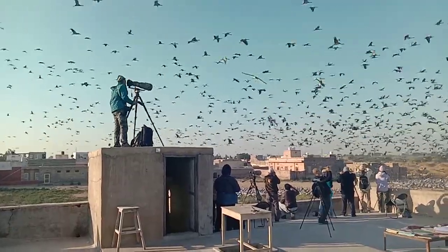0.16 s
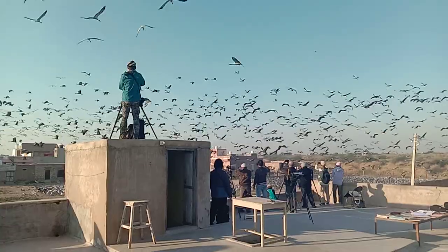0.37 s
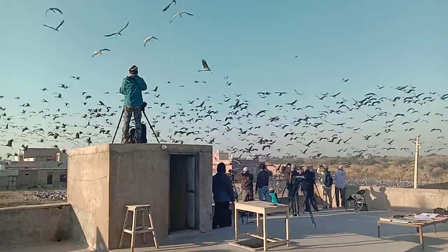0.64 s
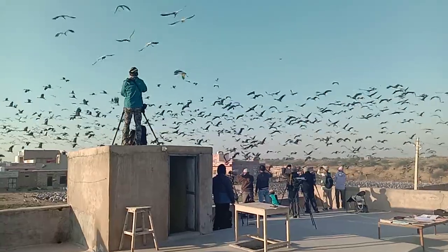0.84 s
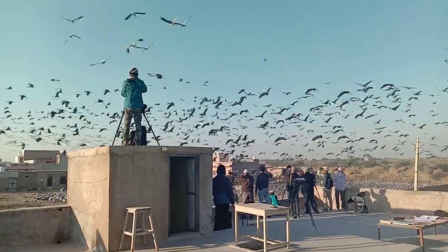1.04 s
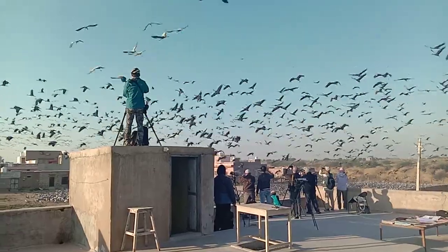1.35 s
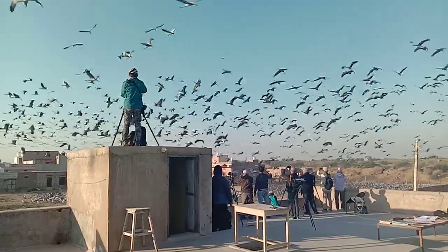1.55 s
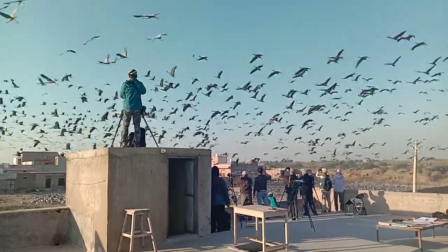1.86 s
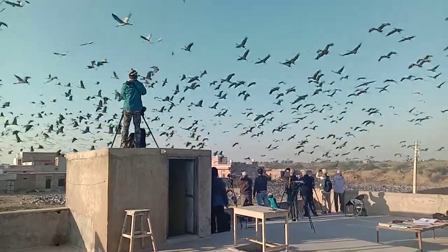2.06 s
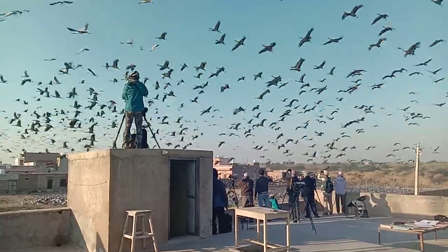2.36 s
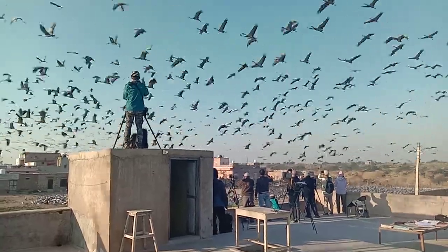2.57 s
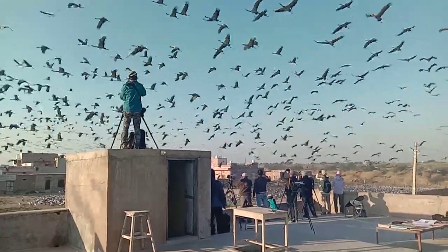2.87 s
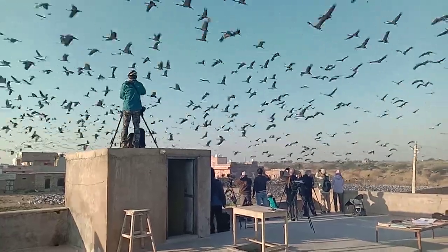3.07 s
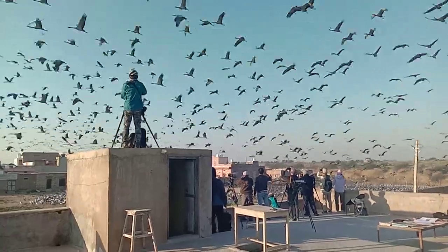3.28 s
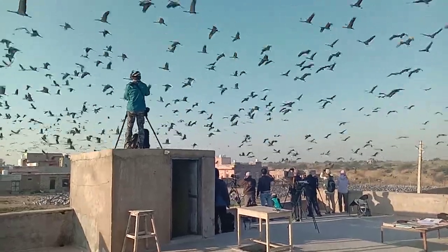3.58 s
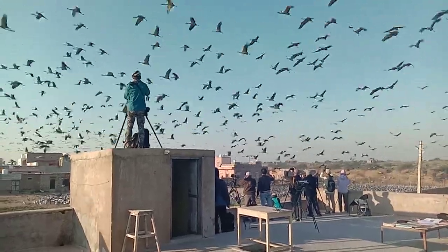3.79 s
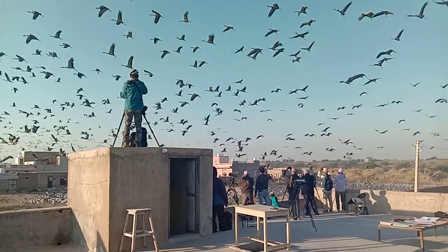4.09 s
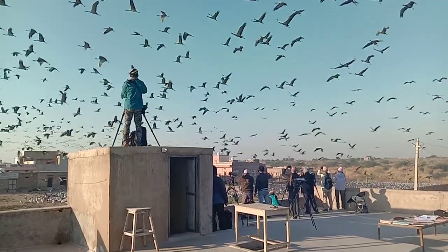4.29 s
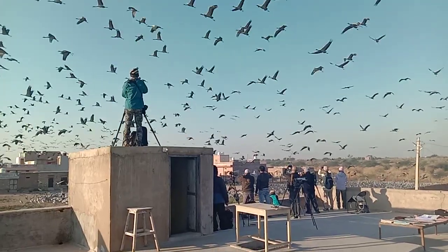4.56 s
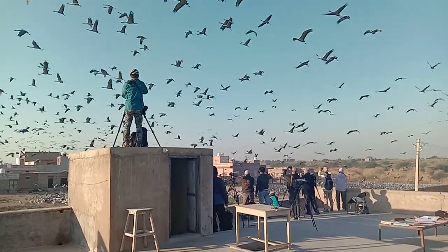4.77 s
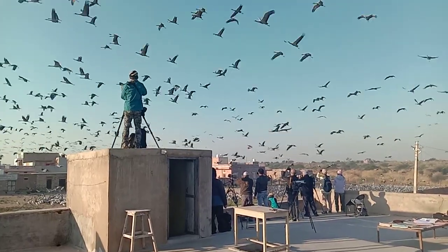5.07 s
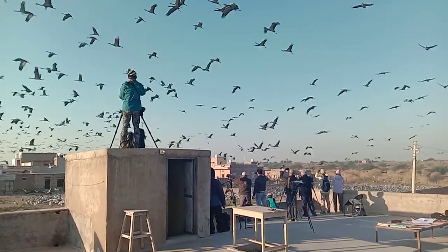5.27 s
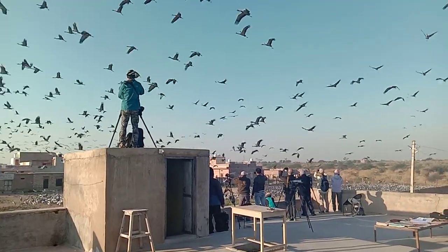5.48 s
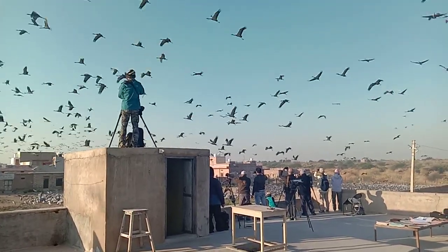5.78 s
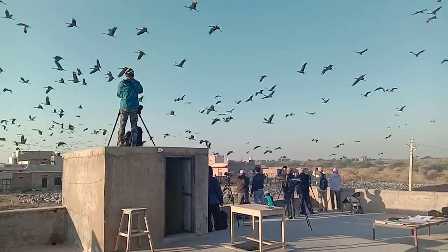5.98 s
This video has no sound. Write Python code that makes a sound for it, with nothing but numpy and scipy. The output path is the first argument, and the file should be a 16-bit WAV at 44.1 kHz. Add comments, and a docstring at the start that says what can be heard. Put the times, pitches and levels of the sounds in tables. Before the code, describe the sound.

A large flock of cranes is already in full cry at 0 s and keeps calling to the end at about 6 s. Hundreds of distant birds merge into an even, grainy mid-pitched roar, each call a short trumpeted roll of about thirty bursts a second. Harsh honks overlap in the first half second, with thin peeps near 0.5 s. Nearer rattles follow one another, and single honks, some higher, some low and mellow, rise out of the crowd. Wind thumps and rumbles low on the microphone, strongest from 1.4 to 3.3 s, with a stronger buffet at 1.7. Young birds whistle around 2 s and briefly near 3.2. From 3.2 to 4.8 s close rattles are crowded, loud and brighter. Then they thin out; clear peeps come at 5.3 to 5.6 s, and a strong, duller rattle closes around 6 s. Short dull rooftop echoes surround the nearer birds.

```python
"""Cranes over a windy rooftop

A large flock calls in flight over a rooftop while gusts of wind rumble on the microphone.
Each call is a rattle of about thirty bursts a second: rough pulses up close, chopped partials in whole calls.
Hundreds of far birds blur into a roar, near birds stand out burst by burst, some whole calls rise
out of the flock, and young birds peep above them. The roof and its walls echo the nearer birds."""
import sys
import numpy as np
from scipy import signal
from scipy.fft import rfft, irfft
from scipy.io import wavfile
from scipy.ndimage import uniform_filter1d

SR = 44100
rng = np.random.default_rng(int(sys.argv[2]) if len(sys.argv) > 2 else 0)


def unload_wav(signal):
    """Save mono or channel-first audio to the path in sys.argv[1] as 16-bit WAV at rate SR, clipped to [-1, 1]."""
    wavfile.write(
        sys.argv[1],
        SR,
        np.round(np.clip(np.atleast_2d(signal).T, -1, 1) * 32767).astype(np.int16),
    )


N = 270774  # samples


def gain_of(db):
    """Decibels to a factor."""
    return 10 ** (np.asarray(db) / 20)


def evened(x):
    """Scales to an rms of one."""
    return x / np.sqrt(np.mean(x ** 2) + 1e-20)


def smoothed_twice(x, size):
    """Two running means in a row."""
    return uniform_filter1d(uniform_filter1d(x, size), size)


def read(points, hz):
    """Reads a spectrum on a logarithmic frequency axis."""
    f, value = np.transpose(points)
    return np.interp(np.log(hz + 1), np.log(f + 1), value)


def curve(rows, column):
    """One column of a table as a value at every sample."""
    rows = np.asarray(rows)
    return np.interp(np.arange(N) / SR, rows[:, 0], rows[:, column])


def coloured(x, points):
    """Filters a sound by a spectrum in dB."""
    hz = np.fft.rfftfreq(len(x), 1 / SR)
    return irfft(rfft(x) * gain_of(read(points, hz)), len(x))


def above(x, hz, order=2):
    """The part of a sound above a frequency."""
    return signal.sosfilt(signal.butter(order, hz, "high", fs=SR, output="sos"), x)


def add(mix, s, sound):
    """Mixes a sound in at a time in seconds."""
    part = mix[round(s * SR):][:len(sound)]
    part += sound[:len(part)]


def beats(first_s, last_s, per_s):
    """Evenly spaced times, and for each its place from 0 to 1 and an arch that is 0 at both ends."""
    place = np.linspace(0, 1, round((last_s - first_s) * per_s) + 1)
    return first_s + (last_s - first_s) * place, place, np.sin(np.pi * place)


def honk(length, first_hz, last_hz, partials_db, rattle=0.56, fade=1.48, rough=0.02096):
    """A trumpeted call: a gliding stack of partials, chopped by the rattle, struck anew by each throat pulse."""
    t = np.arange(round(length * SR)) / SR
    # bursts and throat pulses per second, a little different in every call
    rattle_hz, beat_hz = np.array([31, 158]) * np.exp(.07 * rng.standard_normal(2))
    wobble = evened(uniform_filter1d(rng.standard_normal(len(t)), 90))
    uneven = evened(uniform_filter1d(rng.standard_normal(len(t)), 90))
    arch = 1 + 0.0481 * (np.sin(np.pi * t / length) - .6)  # the pitch rises a little into the middle
    glide_hz = first_hz + (last_hz - first_hz) * t / length
    turns = np.cumsum(glide_hz * (arch + rough * wobble)) / SR
    beat = (np.cumsum(beat_hz * (1 + 0.2455 * uneven)) / SR + rng.random()) % 1

    k = np.arange(1, len(partials_db) + 1)[:, None]
    pulses = np.exp(-fade * k * beat) * np.minimum(beat / 0.095, 1)  # higher partials die sooner after each pulse
    pulses = pulses / np.sqrt(np.mean(pulses ** 2, 1, keepdims=True))
    waves = np.sin(2 * np.pi * (k * turns + rng.random(k.shape)))
    tone = gain_of(partials_db) @ (pulses * waves)
    chop = np.maximum(1 - rattle * np.cos(2 * np.pi * rattle_hz * t), 0)
    return np.sqrt(2) * tone * evened(chop) * signal.windows.tukey(len(t), .35)


def far_flock(count=500):
    """Overlapping distant calls, each with its own pitch, glide, distance and mix of partials."""
    # treble level of the roar above 4.7 kHz, with a brief dip near the start: t/s, level/dB
    treble = [(0, 10.5), (.1, 1), (.22, 2), (.3, 8.5), (2.1, 7.5), (2.7, 4), (3, 8), (3.55, 7), (3.85, 6),
              (4.7, 6), (6.14, 6.5)]
    # spectrum of the roar before that treble level: f/Hz, level/dB
    colour = [(300, -43), (500, -34), (700, -15), (1000, -5.5), (1280, -3.5), (1800, -3), (2500, -6),
              (3800, -17.5), (5400, -31), (6200, -41.5), (7000, -36.5), (8100, -53.5), (9400, -48.5),
              (15600, -87)]
    lead_s = .3  # cut off the front, so that calls are already under way
    out = np.zeros(N + SR)
    starts = (np.arange(count) + rng.random(count)) * (N / SR + lead_s) / count
    traits = rng.standard_normal((count, 12))
    for s, (pitch, glide, length, near, *partials) in zip(starts, traits):
        # most birds near one pitch, some far off
        hz = 1285 * np.exp(np.clip(.06 * pitch * (1 + .8 * pitch ** 2), -.33, .33))
        last_hz = hz * np.exp(.1 * glide - .02)
        partials_db = 3.08 * np.array(partials) - 1.5 * abs(pitch) + 1.94 * near
        add(out, s, honk(.17 * np.exp(.3 * length), hz, last_hz, partials_db))
    wash = .4 * rng.standard_normal(N)  # the farthest birds are only a wash
    out = coloured(evened(out[round(lead_s * SR):][:N]) + wash, colour)
    out = out / np.sqrt(smoothed_twice(out ** 2, 6000))  # the crowd keeps an even loudness
    out = out + (gain_of(curve(treble, 1)) - 1) * above(out, 4700)
    return out * gain_of(-18.5)


def honks():
    """Calls that stand out whole: a harsher one rattles deeper, rings shorter and wavers more."""
    # t/s, length/s, first f/Hz, last f/Hz (before the small arch in pitch), second partial level/dB,
    # first and upper partials level/dB against the second, harshness (0-1)
    calls = [(0, 0.127, 1356, 1367, -27, -16, -27, .7), (.07, 0.17, 1255, 1170, -26.5, -11, -29, 0.99),
             (0.198, 0.18, 1342, 1400, -27.5, -11, -20, .8), (0.585, 0.1, 946, 929, -29.5, -9, -14, 0.82),
             (0.787, 0.25, 1527, 1620, -34, 3.5, -20.5, 1),
             (1.143, 0.18, 1147, 1090, -26.5, -3, -9.5, 0.83),
             (1.624, 0.12, 1146, 1060, -37.5, -7, -1.5, 1), (2.456, .23, 1394, 1438, -36.5, 8, -10.5, 0.5),
             (2.83, .22, 803, 747, -40, 3.5, -2, 0.52), (3.278, 0.11, 1214, 902, -29, -1.5, -16, 0.23),
             (3.358, 0.15, 1292, 1300, -28, -6, -5, .6), (3.421, .2, 1265, 1116, -29, 1.5, -20, 0.13),
             (3.823, 0.12, 1273, 1285, -31, 5, -10.5, .7), (4.101, 0.217, 1380, 1395, -43.5, 20, -2, 0.41),
             (4.36, 0.082, 1256, 1206, -33.5, -1, -15, 0.45), (4.42, 0.1, 1493, 1473, -31.5, 4, -19, 0.5),
             (4.667, 0.15, 1446, 1416, -29.5, 3.5, -11, 0.85),
             (5.101, 0.16, 1360, 1446, -30.5, 3.5, -15.5, 0.74),
             (5.62, .22, 1598, 1478, -47.5, 20, -19, .6), (5.876, 0.24, 976, 930, -33.5, 4.5, -21, 0.73)]
    out = np.zeros(N)
    for s, length, first_hz, last_hz, db, first_db, upper_db, harsh in calls:
        # above the fourth the partials fade evenly
        partials_db = db + np.r_[first_db, 0, upper_db - 3, upper_db - 7.5 * np.arange(7)]
        call = honk(length, first_hz, last_hz, partials_db, rattle=0.43 + 0.99 * harsh,
                    fade=.3 + 1.24 * harsh, rough=0.0073 + .018 * harsh)
        add(out, s, call)
    return above(out - above(out, 8100), 640, order=6)  # little sounds below the first partial


def pulse(hz, ring_s, rough, size=400):
    """One throat pulse: a short rough puff of noise with a faint ring on twelve multiples of a pitch."""
    t = np.arange(size) / SR
    multiples = np.arange(1, 13)[:, None]
    ring = np.sin(2 * np.pi * (multiples * hz * t + rng.random((12, 1)))).sum(0)
    rough = np.clip(rough, 0, 1)
    mix = (1 - rough) * evened(ring) + rough * rng.standard_normal(size)
    return mix * t / ring_s * np.exp(1 - t / ring_s)


def near_birds():
    """Bursts of three pulses about 7 ms apart and a faint fourth; each rattle has its own treble, dull or bright."""
    # first burst t/s, last burst t/s, bursts per s, level/dB before the common lift and colour,
    # swell to the end level/dB, treble above 7.7 kHz level/dB
    rattles = [(0.025, 0.048, 36, -26.5, -7, -16), (0.233, 0.304, 29, -27, -5, -11),
               (0.594, 0.634, 23, -41, 2, -20), (0.728, .8635, 30.5, -27.5, 3, -5),
               (1.019, 1.1244, 36, -29, 3, -10), (1.148, 1.277, 30, -45, -5, -22),
               (1.318, 1.457, 29.6, -25.5, 1, -8), (1.613, 1.772, 36.3, -28, -7, -1),
               (1.855, 1.914, 31, -32, 7, -5), (1.998, 2.1254, 29.6, -30.5, 14, -2),
               (2.435, 2.472, 32, -32, 8, -4), (2.515, 2.683, 31.2, -36, 8, 6),
               (2.8716, 3.01, 30, -26.5, -3, -8), (3.1023, 3.132, 31, -35, 6, 4),
               (3.227, 3.339, 28.2, -23.5, 7, 7), (3.362, 3.5247, 36.7, -22.5, -9.5, 5),
               (3.592, 3.685, 32.3, -29, 4, 9.5), (3.7389, 3.773, 34, -31, -1, 7),
               (3.8367, 3.943, 27.4, -21.5, 1, -5), (3.9704, 4.0486, 39, -22, 4, 4.5),
               (4.085, 4.24, 26, -26, -13, 2.5), (4.286, 4.415, 30, -22, 1.5, 4.5),
               (4.479, 4.511, 29, -24, 1, -1), (4.554, 4.806, 32, -26, -10, 4),
               (4.839, 4.979, 29.8, -29.5, -14, 1), (5.099, 5.228, 38, -29.5, -3, 1),
               (5.519, 5.631, 29, -25.5, -1, -7), (5.7733, 5.826, 21, -27.5, 3, -13),
               (5.932, 6.068, 31, -20, -2, -25)]
    # spectrum common to the near birds: f/Hz, level/dB
    colour = [(400, -66), (800, -5.5), (1300, -2), (2500, -0.5), (4000, -12.5), (6000, -13.5),
              (8000, -21.5), (10000, -23.5), (13000, -29.5), (15500, -38)]
    ends_db = -3  # softer first and last bursts
    chance_db, chance_s = 1.2, .0015  # unevenness of the bursts in level and time
    out = np.zeros(N)
    for first_s, last_s, per_s, db, swell_db, treble_db in rattles:
        times, place, arch = beats(0, last_s - first_s, per_s)
        levels = db + swell_db * (place - .5) + ends_db * (1 - arch)
        rattle = np.zeros(round((last_s - first_s) * SR) + 2500)
        traits = rng.standard_normal((len(times), 8))
        for s, level_db, middle, (late, loud, pitch, gap, *chance) in zip(times, levels, arch, traits):
            burst_s = max(s + chance_s * late * middle, 0)
            burst_db = level_db + chance_db * loud
            gap_s = .0068 + .0003 * gap
            for k, (pulse_db, c) in enumerate(zip([4.5, 0.6, -1.0, -7.0], chance)):
                sound = pulse(1280 * (1 + .05 * pitch), ring_s=0.0017, rough=0.91)
                add(rattle, burst_s + k * gap_s, gain_of(burst_db + pulse_db + 2.3 * c) * sound)
        add(out, first_s, rattle + (gain_of(treble_db) - 1) * above(rattle, 7700))
    return gain_of(10.0) * coloured(out, colour)


def wind():
    """Lumpy low noise; gusts strike quickly, die away and add a knocking upper edge that dies sooner."""
    # light breeze under the gusts, before the lumps: t/s, level/dB
    breeze = [(0.03, -68), (.4, -44), (2.2, -46.5), (3.4, -45.5), (4.3, -53), (4.8, -50), (6.14, -49)]
    # gusts on the microphone, before the lumps: t/s, peak level/dB, dying time/s, edge level/dB against the peak
    gusts = [(.48, -40, 0.091, -29), (1.05, -45, 0.097, -8), (1.39, -28, 0.077, -12.5),
             (1.48, -31, 0.18, -17.5), (1.708, -21, 0.069, -6), (1.84, -30, 0.031, -6),
             (2.34, -39, 0.056, -17), (2.45, -27, 0.061, -4.5), (2.518, -27, 0.18, -3.5),
             (2.85, -32, 0.075, -1.5), (3.04, -28, 0.016, -25), (3.16, -29, .12, -21), (3.28, -27, 0.1, -4),
             (4.38, -36.5, 0.034, -7), (4.72, -38, 0.11, -21), (5.39, -42, .04, -20)]
    # spectrum of the rumble before it is scaled to an rms of one: f/Hz, level/dB
    rumble_colour = [(12, -57), (27, -39), (63, 3.5), (105, 8), (170, 1.5), (230, -11.5), (400, -60)]
    # spectrum of the knocking edge, scaled likewise: f/Hz, level/dB
    edge_colour = [(120, -45), (200, -3), (300, -6), (450, -17.5), (650, -27), (900, -68)]
    rise_s, edge_dies_faster = 0.025, 2.22
    rumble = evened(coloured(rng.standard_normal(N), rumble_colour))
    edge = evened(coloured(rng.standard_normal(N), edge_colour))
    lumps = evened(smoothed_twice(rng.standard_normal(N), 900))
    t = np.arange(N) / SR
    low = gain_of(curve(breeze, 1))
    high = low * gain_of(-16.5)
    for s, db, dying_s, edge_db in gusts:
        age = np.maximum((t - s) / dying_s, (s - t) / rise_s)  # 0 at the peak, growing on both sides
        low = low + gain_of(db) * np.exp(-age ** 1.02)
        high = high + gain_of(db + edge_db) * np.exp(-edge_dies_faster * age)
    return rumble * low * gain_of(2.33 * lumps) + edge * high * gain_of(3.9 * lumps)


def peeps():
    """Young birds: thin, slightly hoarse whistled notes in short phrases, each note sliding up or down."""
    # first note t/s, last note t/s, notes per s, first f/Hz, last f/Hz (before the arch in pitch),
    # slide within a note f/Hz, level/dB before the arch in level, overtones level/dB
    phrases = [(0.501, .58, 29, 3900, 3120, -150, -30, -12), (1.92, 2.09, 30.7, 3660, 3695, 550, -24, -17),
               (2.16, 2.245, 23, 3850, 3200, -160, -31, -11),
               (3.137, 3.215, 25.5, 3650, 3890, 200, -34, -21),
               (5.306, 5.35, 21, 4030, 3900, 352, -27.5, -18),
               (5.384, 5.421, 26, 3755, 3360, -240, -23.5, -19),
               (5.489, 5.563, 48, 3640, 3640, 330, -26, -27), (5.596, 5.596, 28, 3500, 3500, -30, -24, -15)]
    # partials 2, 3 and 4, before each phrase's overtone level: level/dB
    overtones_db = [-3.5, -16, -34]
    duty = .78  # sounding share of each note's turn
    pitch_arch, ends_db = 0.0427, -3.5  # pitch and level rise into the middle of a phrase
    out = np.zeros(N)
    for first_s, last_s, per_s, first_hz, last_hz, slide_hz, db, over_db in phrases:
        for s, place, arch in zip(*beats(first_s, last_s, per_s)):
            u = np.linspace(-.5, .5, round(duty / per_s * SR))
            hoarse = .024 * evened(uniform_filter1d(rng.standard_normal(len(u)), 60))
            note_hz = (first_hz + (last_hz - first_hz) * place) * (1 + pitch_arch * arch)
            turns = np.cumsum((note_hz + slide_hz * u) * (1 + hoarse)) / SR
            over = sum(gain_of(g) * np.sin(2 * np.pi * k * turns) for k, g in enumerate(overtones_db, 2))
            tone = np.sin(2 * np.pi * turns) + gain_of(over_db) * over
            level = np.sqrt(2) * gain_of(db + ends_db * (0.5 - arch))
            add(out, s, level * tone * signal.windows.tukey(len(u), .45))
    return out


def rooftop(x):
    """The roof and its walls throw back sparse, dull echoes in a short tail."""
    t = np.arange(6000) / SR
    sparse = rng.standard_normal(6000) * (rng.random(6000) < .05)
    tail = sparse * gain_of(-60 * t / 0.18) * (t > .004)  # falls at 60 dB per 0.18 s
    echoes = signal.oaconvolve(x, tail / np.linalg.norm(tail))[:N]
    return x + gain_of(-6) * (echoes - .4 * above(echoes, 6000))


def scene():
    """Far flock, nearer birds with their echoes, and wind on the microphone."""
    birds = rooftop(near_birds() + honks() + peeps())
    return (far_flock() + birds + wind())[None]


def record(dry):
    """The recorder's band limit: a steep low-pass at 15730 Hz."""
    low_pass = signal.firwin(511, 15730, window=("kaiser", 9), fs=SR)
    return signal.oaconvolve(dry, low_pass[None], "same")


dry = scene()
out = record(dry)
unload_wav(out)
```